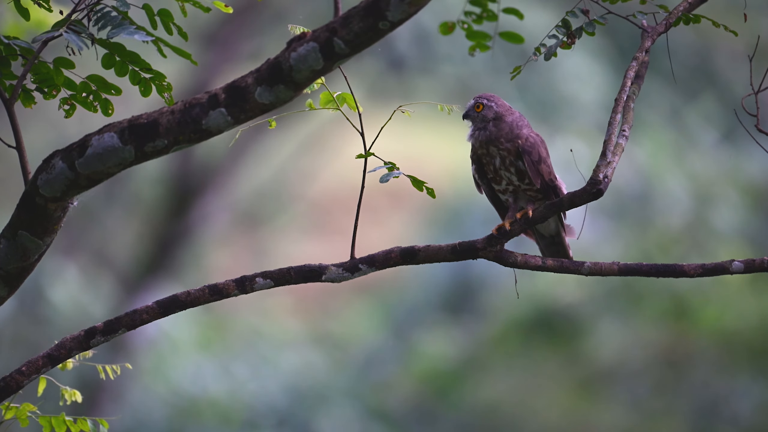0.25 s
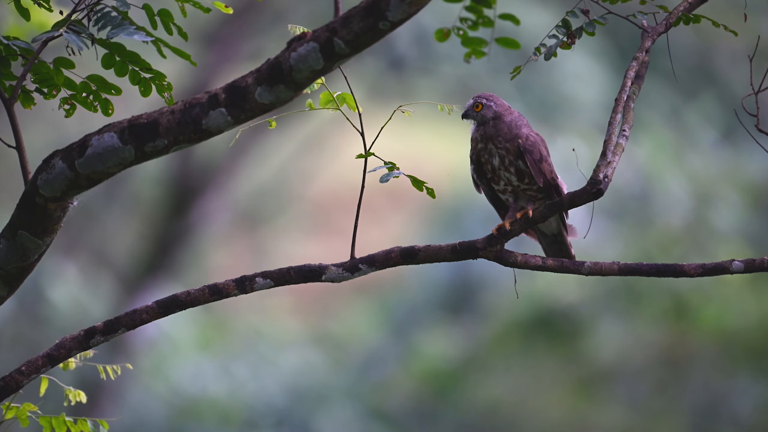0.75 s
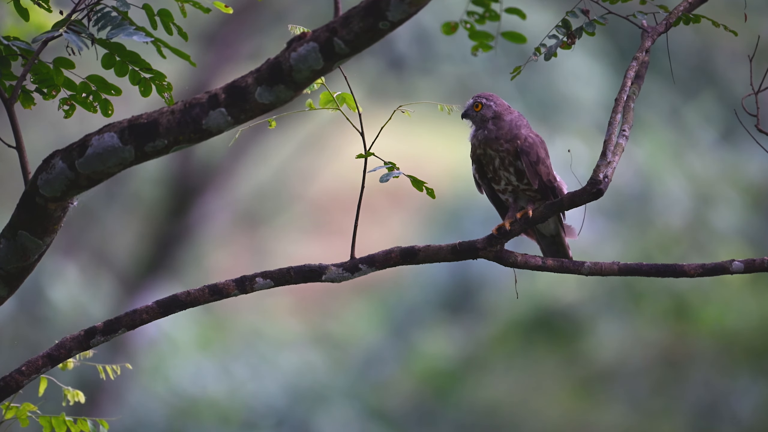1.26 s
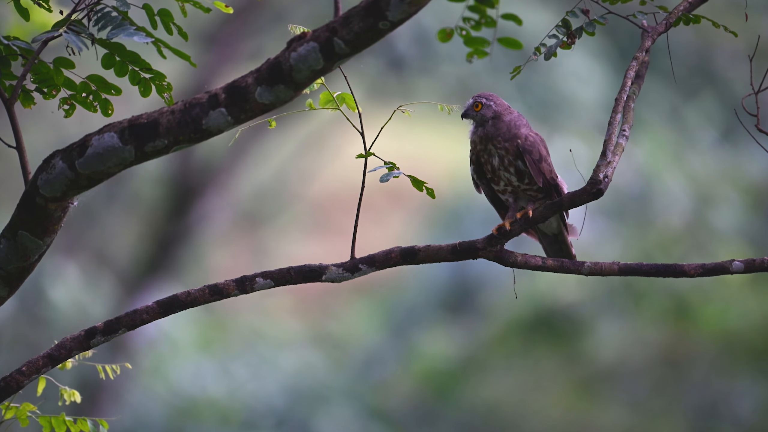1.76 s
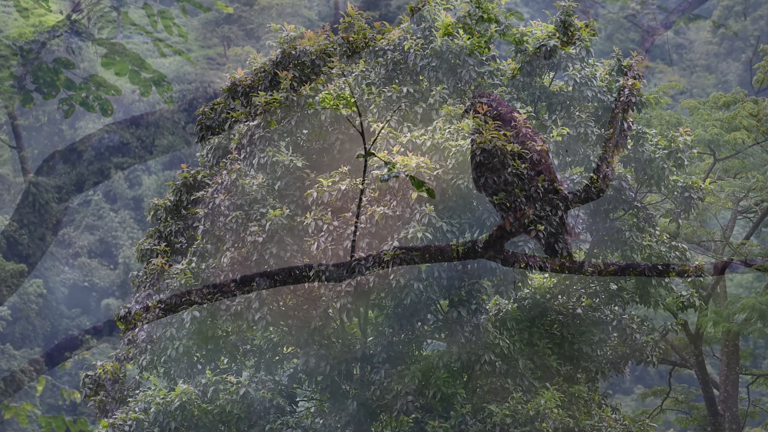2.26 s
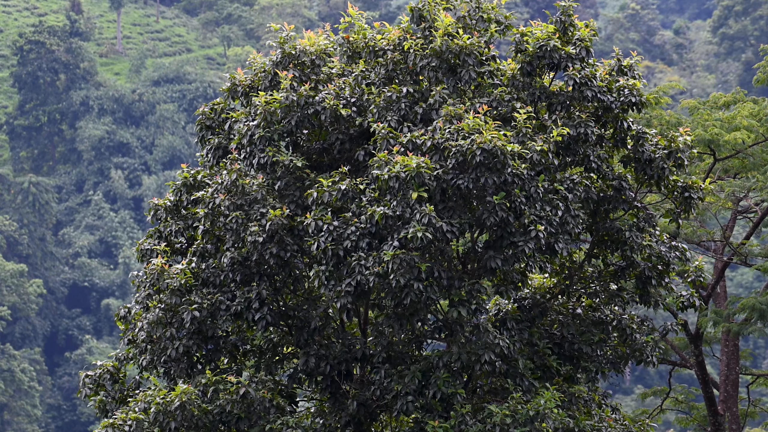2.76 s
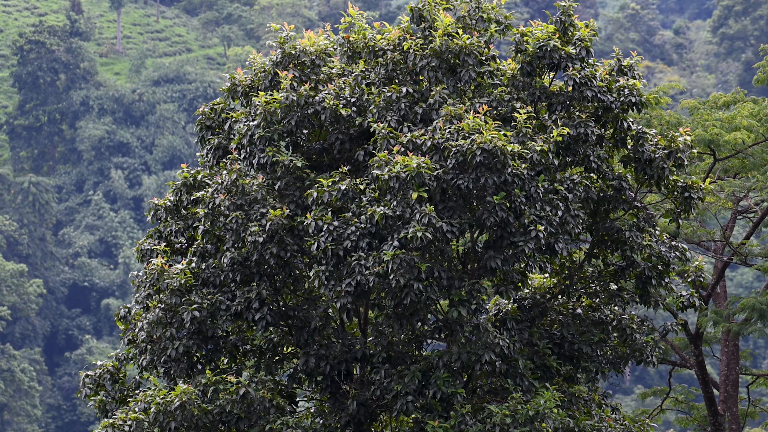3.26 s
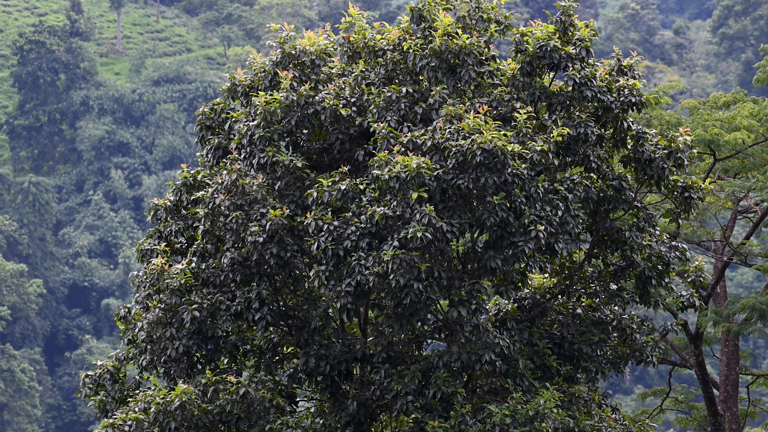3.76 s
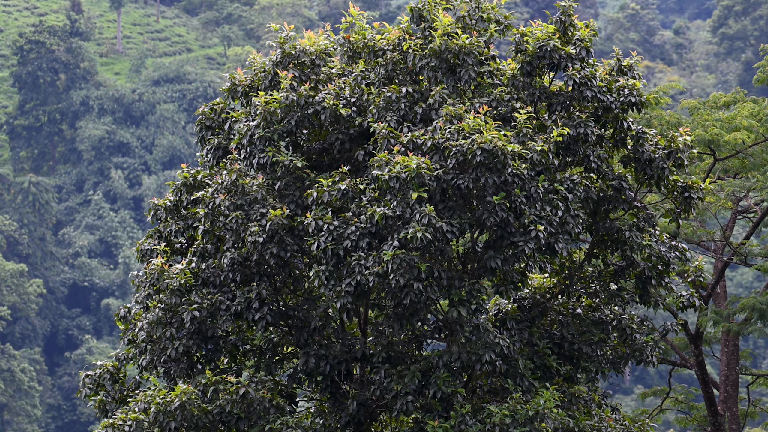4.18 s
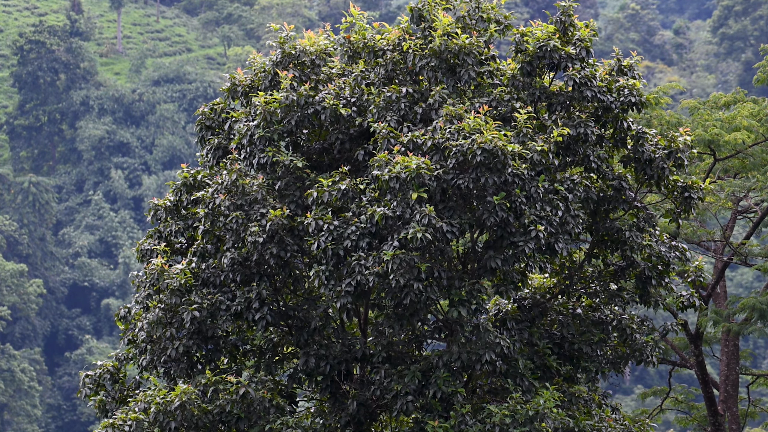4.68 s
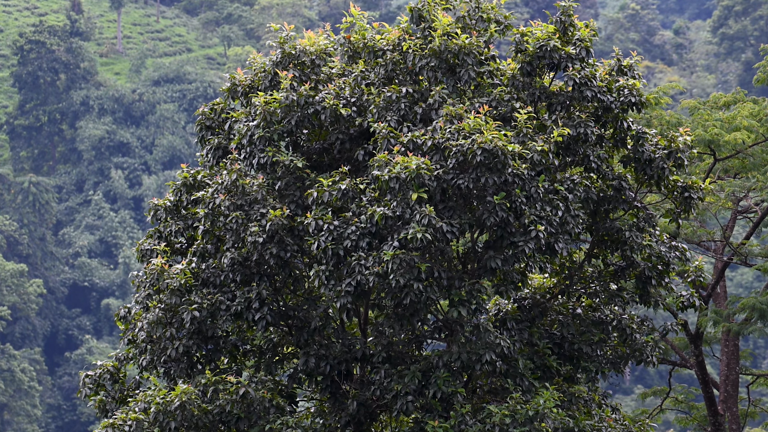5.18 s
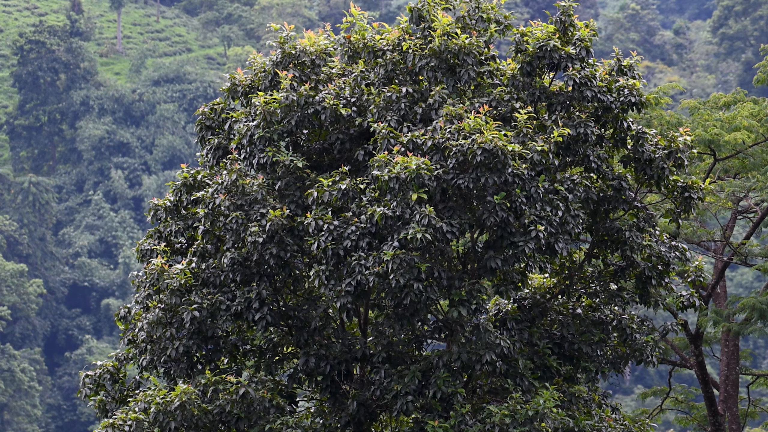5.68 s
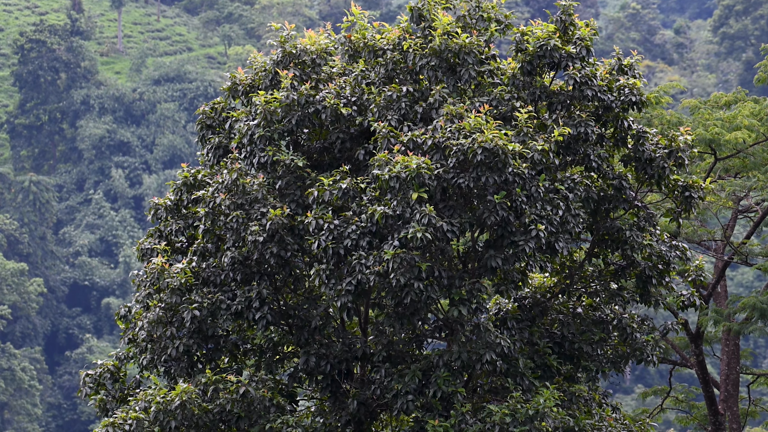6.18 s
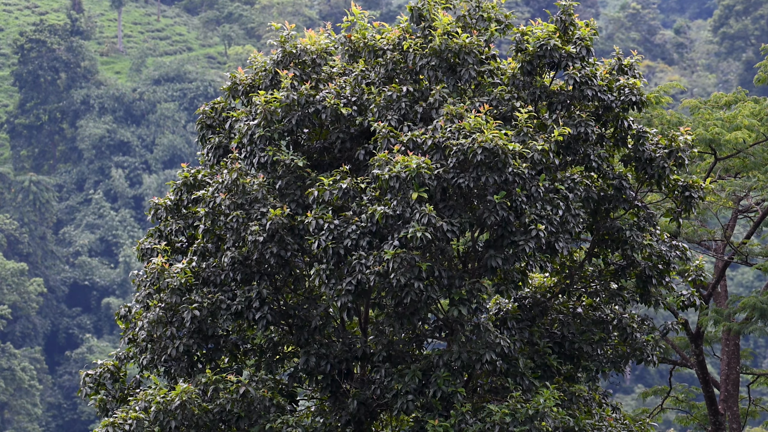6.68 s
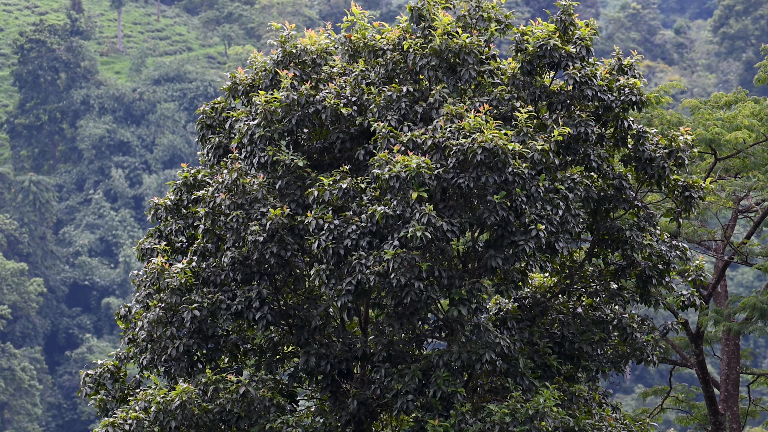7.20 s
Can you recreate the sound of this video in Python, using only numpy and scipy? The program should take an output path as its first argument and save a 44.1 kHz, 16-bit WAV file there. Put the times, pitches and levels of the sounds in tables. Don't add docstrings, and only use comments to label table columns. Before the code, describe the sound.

A soft, wide valley hum lies under a small owl in the trees. From 0.2 s it gives six mellow, almost pure hoots, starting near 0.2, 0.85, 1.5, 2.2, 2.9 and 3.7 s, each about 0.3 s: quick onset, held note around 570 Hz, a short climb to about 680 Hz, then a drop, with faint echoes from trunks. A near cricket chirps thinly in groups of up to four strokes about three times a second; a far one trills occasionally; tiny ticks appear. At 4.25 s a very short hush, then the hum fades up again. A broken, cracking hoot comes at 5.7 s and a deeper one swelling upward at 6.4 s. At 7.1 s the sound cuts to a louder, centred single microphone: two clicks, wind rumble and a shaking mount, leaf rustle, cicada hiss, lingering hoot echoes, and a strong hoot from 7.23 s, still held at the end.

```python
import sys
import numpy as np
from scipy import signal
from scipy.fft import rfft, irfft
from scipy.io import wavfile
from scipy.ndimage import uniform_filter1d

SR = 44100
rng = np.random.default_rng(int(sys.argv[2]) if len(sys.argv) > 2 else 0)


def put_to_file(sound):
    columns = np.atleast_2d(sound).T
    safe = np.clip(columns, -1, 1)
    whole_steps = np.round(safe * 32767)
    wavfile.write(sys.argv[1], SR, whole_steps.astype(np.int16))


def amplitude_ratio(level_db):
    exponent = np.asarray(level_db, float) / 20
    return 10 ** exponent


N = 328104
T = np.arange(N) / SR
LAST_START_S = 7.119

# frequency_hz [Hz], density_db [dB per Hz]
VALLEY_COLOUR = [(20, -61.5), (60, -41.5), (122, -18), (227, -6), (400, -0.5), (1000, -2.5), (1950, -7),
                 (3300, -16.5), (4400, -24), (5600, -27), (7500, -43), (10100, -40.5), (11000, -51.5),
                 (15500, -69.5)]
# frequency_hz [Hz], density_db [dB per Hz]
CICADA_COLOUR = [(760, -30), (850, -3), (1000, -3), (1300, -10), (2100, -1.5), (2700, -7), (3300, -12.5),
                 (3700, 2), (4700, -0.5), (5400, -11.5), (10100, -14.5), (10500, -28.5), (13000, -23),
                 (15700, -33.5)]
# frequency_hz [Hz], density_db [dB per Hz]
LINGER_COLOUR = [(320, -26), (390, -5.5), (450, 1), (560, -4.5), (680, -6), (760, -19), (900, -33.5)]
# frequency_hz [Hz], density_db [dB per Hz]
WIND_COLOUR = [(12, -12), (25, -2), (45, -1), (70, -5.5), (120, -22.5), (200, -24), (330, -32.5),
               (400, -53.5)]
# frequency_hz [Hz], density_db [dB per Hz]
GUST_COLOUR = [(40, -30.5), (65, 6), (130, -2), (180, -27)]
# frequency_hz [Hz], density_db [dB per Hz]
RUSTLE_COLOUR = [(750, -18), (1000, -5), (2400, -1), (3200, -20)]

# after_s [s after the last scene opens], peak_db [dB], rise_db, fall_db [dB per s]
WIND_SWELL = (-0.7, -30, 150, 60)
GUST_SWELL = (-0.6, -25, 200, 200)
RUSTLE_SWELL = (0.0761, -43, -22, 451.5)
WOBBLE_SWELL = (.055, -19.5, 170, 80)

# start_s [s], end_s [s]
CUTS = [
    (4.251, 4.274),
    (7.101, 7.5),
]
# [dB, low bump]
TICKS = [
    (.032, -56, -70),
    (.715, -58, -100),
    (1.331, -55, -72),
    (2.049, -60, -100),
    (2.732, -58, -100),
    (3.348, -56, -74),
    (7.1215, -32, -60),
    (7.197, -33, -60),
]

# start_s [s], level_db [dB], pitch_hz [Hz]
FAR_TRILLS = [
    (.658, -66, 6200),
    (2.675, -66, 6200),
    (4.31, -84, 6250),
    (5.262, -72, 6200),
    (6.325, -71, 6200),
]
FAR_STROKES = [2, 2, 7, 10, 10]
# start_s [s], level_db [dB]
NEAR_CHIRPS = [(0.0074, -59), (0.3502, -58.5), (0.6978, -59), (0.82, -60.5), (1.167, -60.5), (1.3527, -62),
               (1.655, -61), (1.998, -60), (2.061, -57.5), (2.3686, -59), (2.7159, -60), (2.836, -60),
               (3.186, -59.5), (3.4989, -60), (3.8377, -60.5), (4.1834, -59.5), (4.3969, -69.5),
               (4.4583, -68), (4.8199, -60), (5.1623, -54.5), (5.5089, -53.5), (5.867, -53.5),
               (6.2178, -55), (6.568, -55), (6.908, -56.5)]
NEAR_STROKES = [4, 4, 1, 4, 4, 3, 4, 2, 3, 4, 1, 4, 4, 4, 4, 2, 1, 3, 4, 4, 4, 4, 4, 4, 4]

# delay_s [s], left_db [dB], right_db [dB]
TRUNKS = [
    (.03, -36, -38),
    (.066, -36, -37),
    (.095, -36, -35),
]
# start_s [s], end_s [s], held_hz [Hz], overshoot_hz [Hz], held_db [dB]
HOOTS = [(0.192, 0.511, 570.5, 587.7, -12.5), (0.852, 1.159, 562.6, 574, -13.5),
         (1.476, 1.784, 569, 587.7, -13), (2.209, 2.527, 569.3, 588.3, -12.5),
         (2.869, 3.176, 563.5, 576.7, -12.5), (3.659, 3.968, 569, 588, -12)]
# after_start_s [s], pitch_hz [Hz], level_db [dB over the held note]
OPENING = [
    (0, 474, -25.5),
    (.028, 531, -10.5),
    (.043, 556, -1.5),
    (.058, 576, 2.4),
]
# before_end_s [s], pitch_hz [Hz], level_db [dB]
CLOSING = [
    (.112, 596, -10.5),
    (.067, 647, -7.5),
    (.055, 668, -10.5),
    (0.036, 678.7, -12.5),
    (0.01, 622, -15.5),
    (-0.0037, 582, -34),
]
# start_s [s], pitch_hz [Hz], level_db [dB]
BROKEN_HOOT = [
    (5.695, 560, -41.5),
    (5.719, 574, -33),
    (5.729, 545, -26),
    (5.743, 524, -31.5),
    (5.77, 540, -23.5),
    (5.8, 578, -13.5),
    (5.835, 635, -15),
    (5.862, 615, -14.5),
    (5.881, 555, -39),
]
# start_s [s], pitch_hz [Hz], level_db [dB]
DEEP_HOOT = [
    (6.413, 478, -39),
    (6.47, 565.3, -13.5),
    (6.545, 546, -18),
    (6.6, 550, -16),
    (6.626, 572, -11),
    (6.676, 649, -10),
    (6.692, 665, -11.5),
    (6.72, 611, -15.5),
    (6.735, 600, -38.5),
]
# start_s [s], pitch_hz [Hz], level_db [dB]
LAST_HOOT = [
    (7.228, 428.4, -34),
    (7.268, 502.9, -20),
    (7.296, 558.7, -5),
    (7.322, 574, -6),
    (7.35, 558.3, -4),
    (7.387, 540, -6),
    (7.411, 547.6, -4.1),
    (7.45, 539.7, -4.5),
]
# start_db [dB], drift_db [dB per s]
OVERTONE = (-29.5, -4.5)
BROKEN_OVERTONE = (-55, 150)
LAST_OVERTONE = (-25, -230)


def curve(rows):
    s, *columns = np.transpose(rows)
    return [np.interp(T, s, column) for column in columns]


def walk(rate):
    k = int(SR / rate)
    steps = np.repeat(rng.standard_normal(N // k + 1), k)
    return uniform_filter1d(uniform_filter1d(steps, k), k)[:N]


def hiss(colour, swell_db, flicker_db, channels):
    hz = np.maximum(np.arange(N // 2 + 1) * SR / N, 1)
    f, db = np.transpose(colour)
    gain = amplitude_ratio(np.interp(np.log(hz), np.log(f), db, left=-150, right=-150))
    spectrum = rfft(rng.standard_normal((channels, N))) * gain
    out, swell = 0, walk(.7)
    for octave in range(4, 15):
        share = np.clip(1 - abs(np.log2(hz) - octave), 0, 1)
        band = irfft(spectrum * share, N)
        out = out + amplitude_ratio(swell_db * swell + flicker_db * walk(9)) * band
    return out / np.sqrt(np.mean(out ** 2))


def echo(x, t60_s, gap_s, channels):
    t = np.arange(SR // 2) / SR
    beads = rng.standard_normal((channels, len(t))) ** 3
    response = beads * amplitude_ratio(-60 * t / t60_s) * (t > gap_s)
    response = response / np.sqrt(np.sum(response ** 2, axis=1, keepdims=True))
    return signal.fftconvolve(x[None], response, axes=1)[:, :N]


def valley():
    fade_from_s, fade_s, fade_depth_db = 4.262, 1.14, -15
    remaining = np.clip(1 - (T - fade_from_s) / fade_s, 0, 1) ** 1.2
    fader_db = fade_depth_db * (T > fade_from_s) * remaining
    return amplitude_ratio(-43.5 + fader_db) * hiss(VALLEY_COLOUR, 0.24, 0.32, channels=2)


def cicadas():
    return amplitude_ratio(-38.6) * hiss(CICADA_COLOUR, .2, 1.2, channels=1)[0]


def linger():
    return amplitude_ratio(-30.5) * hiss(LINGER_COLOUR, .3, 0.62, channels=1)[0]


def gusting(after_s, peak_db, rise_db, fall_db):
    late_s = T - LAST_START_S - after_s
    slope_db = np.where(late_s < 0, rise_db, -fall_db)
    return amplitude_ratio(np.minimum(peak_db + slope_db * late_s, 0))


def wind():
    lull_db = -39
    rumble = np.hypot(gusting(*WIND_SWELL), amplitude_ratio(lull_db)) * hiss(WIND_COLOUR, 0.37, 1.4, channels=1)[0]
    buffet = gusting(*GUST_SWELL) * hiss(GUST_COLOUR, 0.19, 1.8, channels=1)[0]
    leaves = gusting(*RUSTLE_SWELL) * hiss(RUSTLE_COLOUR, .3, 2.7, channels=1)[0]
    return rumble + buffet + leaves


def wobble():
    settled_hz, start_excess, settle_s, second_db = 42, .6, .03, -3
    settle = np.exp(-np.maximum(T - LAST_START_S, 0) / settle_s)
    hz = settled_hz * (1 + start_excess * settle) * (T > LAST_START_S)
    phase = 2 * np.pi * np.cumsum(hz) / SR
    second = amplitude_ratio(second_db) * settle ** .45 * np.sin(2 * phase)
    return gusting(*WOBBLE_SWELL) * amplitude_ratio(.8 * walk(30)) * (np.sin(phase) + second)


def ticks():
    out, t = np.zeros(N + SR), np.arange(1600) / SR
    for start, db, bump_db in TICKS:
        i = int(start * SR)
        click = uniform_filter1d(rng.standard_normal(len(t)), size=2) * np.exp(-t / .001)
        out[i:i + len(t)] += amplitude_ratio(db + 4) * click
        out[i:i + len(t)] += amplitude_ratio(bump_db + 8.5) * np.exp(-t / .008)
    return out[:N]


def cricket(chirps, strokes, period_s, length_s, fall, climb, grow_db, scatter_db):
    out = np.zeros(N + SR)
    u = np.arange(int(length_s * SR)) / (length_s * SR)
    shape = np.sin(np.pi * u ** .8) ** 1.5
    for (start, db, hz), count in zip(chirps, strokes):
        for k, chance in enumerate(rng.standard_normal(count)):
            stroke_hz = hz * (1 + climb * k - fall * u ** 1.7)
            tone = np.sin(2 * np.pi * np.cumsum(stroke_hz) / SR)
            i = max(int((start + k * period_s) * SR), 0)
            out[i:i + len(u)] += amplitude_ratio(db + grow_db * k + scatter_db * chance) * shape * tone
    return out[:N]


def insects():
    chirps = [(s - .008, db - 0.5, 5460) for s, db in NEAR_CHIRPS]
    near = cricket(chirps, NEAR_STROKES, period_s=.0362, length_s=0.022, fall=.11, climb=0,
                   grow_db=0.49, scatter_db=1.2)
    far = cricket(FAR_TRILLS, FAR_STROKES, period_s=.036, length_s=.014, fall=.04, climb=.004,
                  grow_db=.1, scatter_db=1.8)
    direct = near * amplitude_ratio(np.array([[1.5], [-1.5]])) + far * amplitude_ratio(np.array([[-.7], [.7]]))
    return direct + amplitude_ratio(-13) * echo(near + far, .12, .004, channels=2)


def hoot(start, end, held_hz, overshoot_hz, held_db):
    climb_s = .15
    opening = [(start + s, hz, held_db + db) for s, hz, db in OPENING]
    held = [(start + .081, overshoot_hz, held_db + 1),
            (start + .124, held_hz, held_db),
            (end - climb_s, held_hz + 3.3, held_db - 1.1)]
    closing = [(end - s, hz, db) for s, hz, db in CLOSING]
    return opening + held + closing


def owl(hoots, overtone_db, drift_db):
    knee_hz = 600
    thinning_db_per_hz, lag_s = -0.1695, .025
    soft_db = 0.5
    third_db, edge_s = -20, .008
    out = np.zeros((2, N))
    for rows in hoots:
        s, first_hz, first_db = rows[0]
        rows = [(s - .006, .96 * first_hz, first_db - 10.5)] + list(rows)
        hz, db = (uniform_filter1d(c, SR // 160) for c in curve(rows))
        high_hz = np.maximum(hz - knee_hz, 0)
        was_hz = np.maximum(high_hz, np.interp(T - lag_s, T, high_hz))
        over_db = db + overtone_db + drift_db * np.clip(T - s, 0, 1)
        over_db = over_db + thinning_db_per_hz * was_hz + soft_db * np.minimum(db - db.max() + 7, 0)
        pan_db = 1.4 - 0.0477 * high_hz
        gate = np.clip(np.minimum(T - rows[0][0], rows[-1][0] - T) / edge_s + 1, 0, 1)
        phase = 2 * np.pi * np.cumsum(hz * (gate > 0)) / SR + np.array([[-.05], [.05]])
        partials = np.sin(2 * phase) + amplitude_ratio(third_db) * np.sin(3 * phase)
        upper = amplitude_ratio(over_db + 1.8 * walk(30) + np.array([[3.], [-3.]])) * partials
        voice = amplitude_ratio(db) * np.sin(phase) + upper
        out += np.sqrt(2) * gate * voice * amplitude_ratio(np.array([pan_db, -pan_db]) / 2)
    return out


def owl_among_trees():
    flutter_db = 4.5
    bird = owl([hoot(*row) for row in HOOTS] + [DEEP_HOOT], *OVERTONE)
    bird = bird + owl([BROKEN_HOOT], *BROKEN_OVERTONE)
    direct = bird.mean(axis=0)
    for delay_s, *side_db in TRUNKS:
        gain = amplitude_ratio(np.array(side_db)[:, None] + flutter_db * walk(45))
        bird = bird + gain * np.interp(T - delay_s, T, direct)
    tail = echo(direct, t60_s=.33, gap_s=.014, channels=2)
    return bird + amplitude_ratio(-28 + flutter_db * walk(60)) * tail


def owl_in_hollow():
    bird = owl([LAST_HOOT], *LAST_OVERTONE).mean(axis=0)
    return bird + amplitude_ratio(-25.5) * echo(bird, t60_s=0.49, gap_s=0.018, channels=1)[0]


def wide_scenes():
    out = owl_among_trees() + insects() + valley()
    for start, end in CUTS:
        outside = np.clip(np.maximum(start - T, T - end) / .001, 0, 1)
        out = out * np.maximum(outside, amplitude_ratio(-26))
    return out


def last_scene():
    opening = np.clip((T - LAST_START_S) / 0.0018, 0, 1)
    return opening * (owl_in_hollow() + cicadas() + wind() + wobble() + linger())


def scene():
    return wide_scenes() + last_scene() + ticks()


def top_cut(x):
    return signal.sosfilt(signal.butter(12, 15760, fs=SR, output="sos"), x)


def record(dry):
    return top_cut(dry)


dry = scene()
out = record(dry)
put_to_file(out)
```